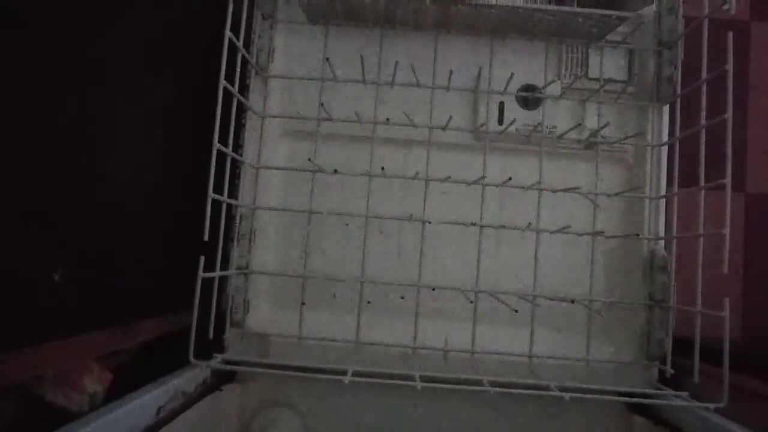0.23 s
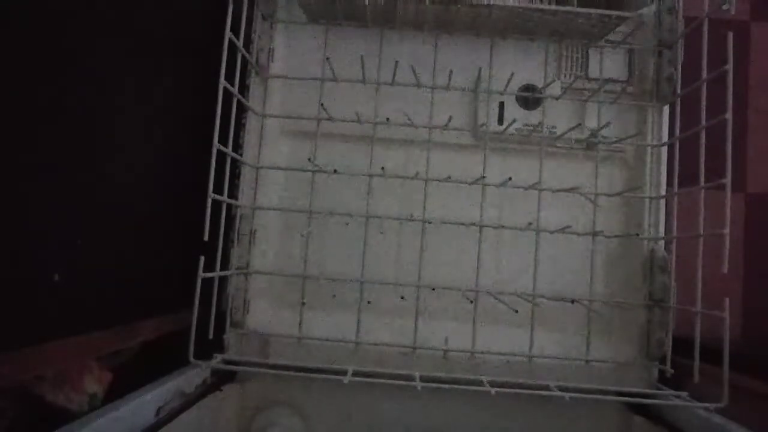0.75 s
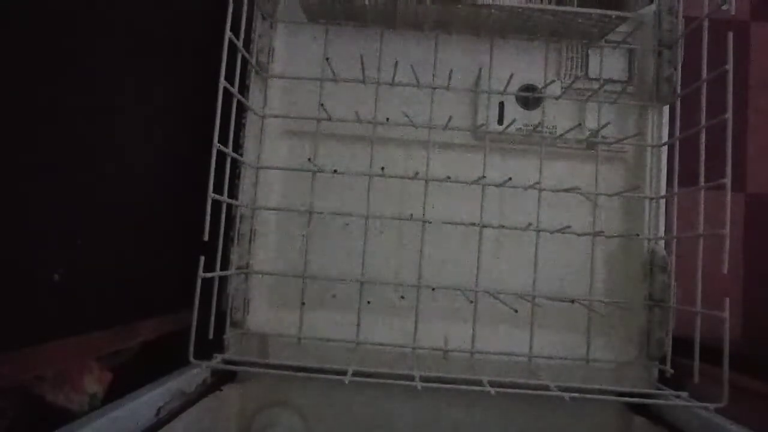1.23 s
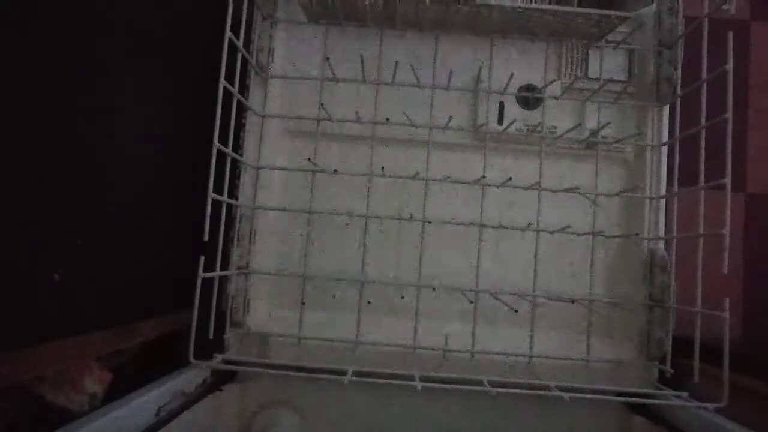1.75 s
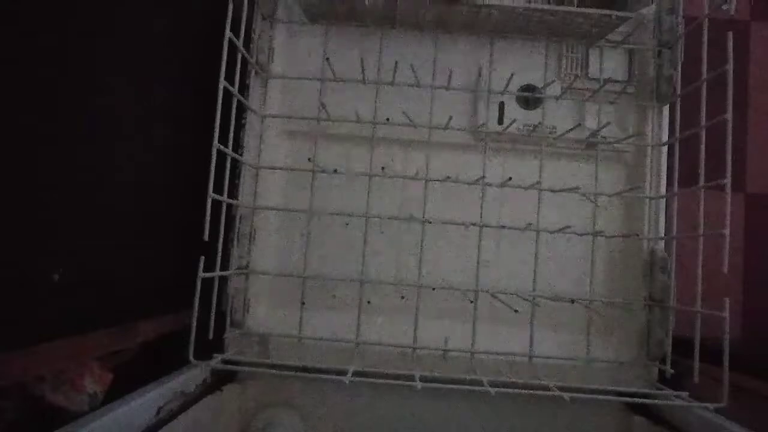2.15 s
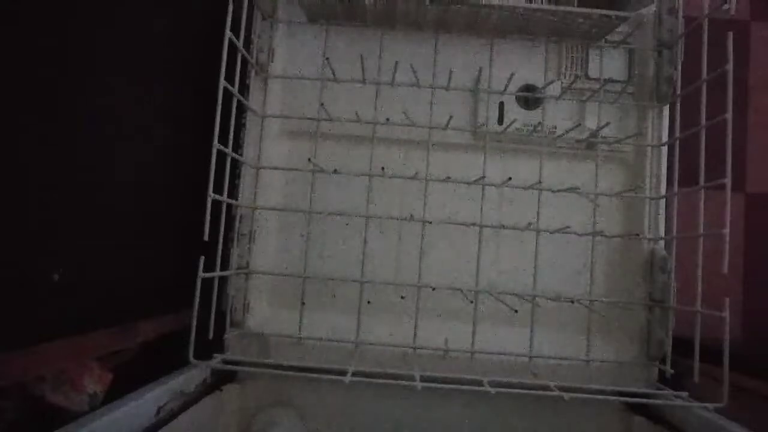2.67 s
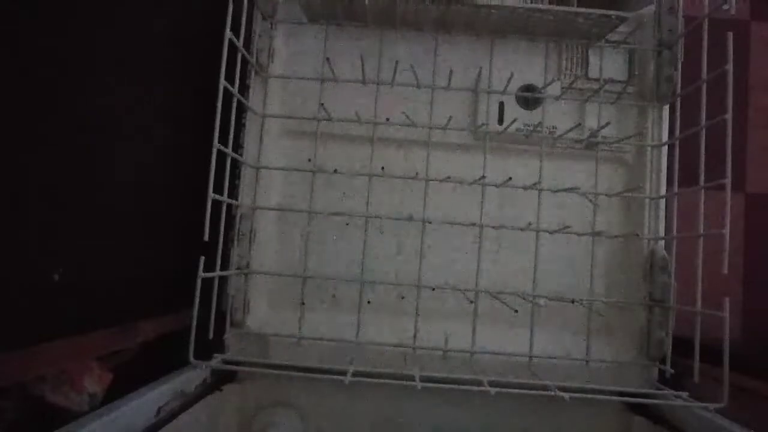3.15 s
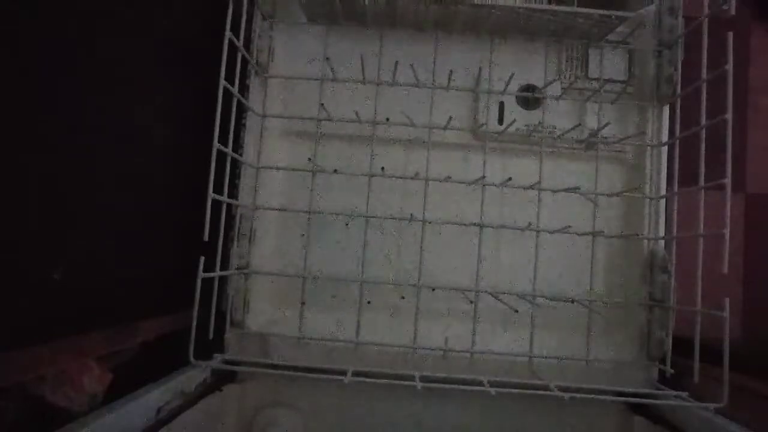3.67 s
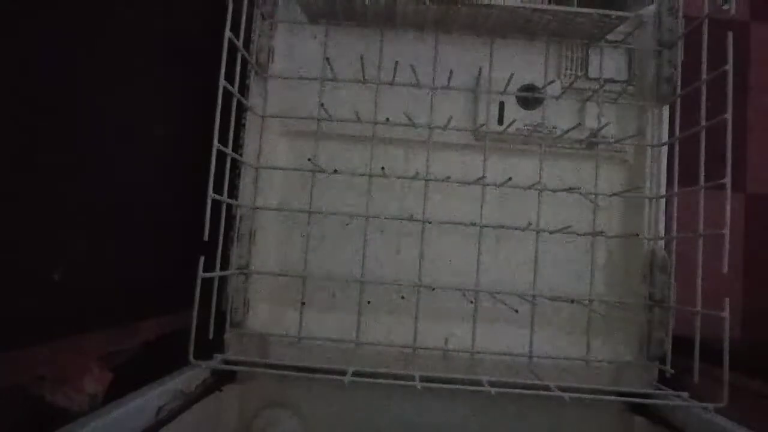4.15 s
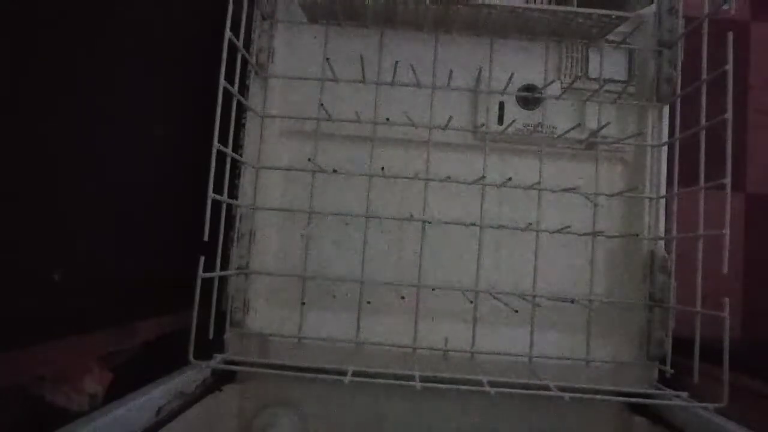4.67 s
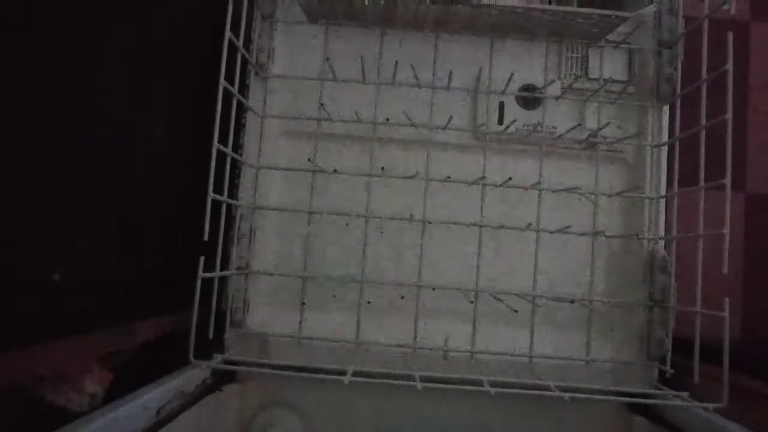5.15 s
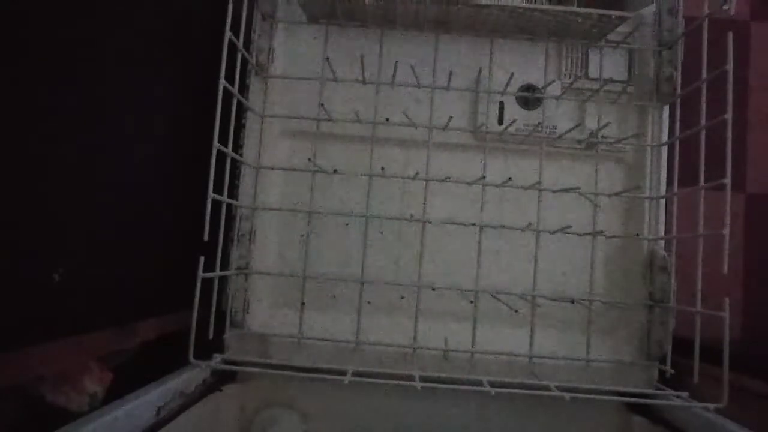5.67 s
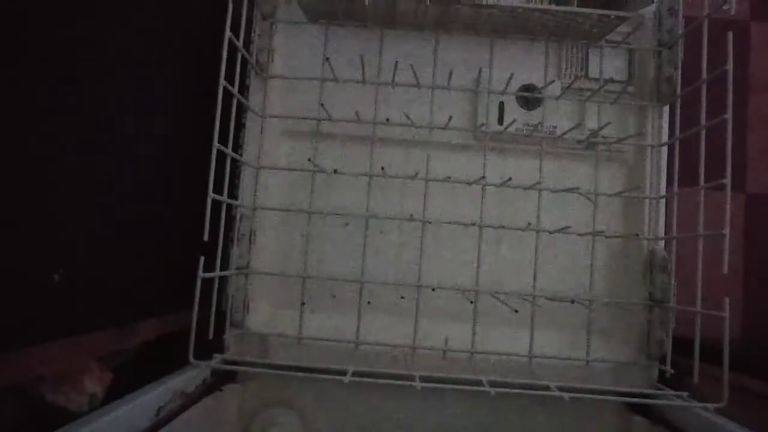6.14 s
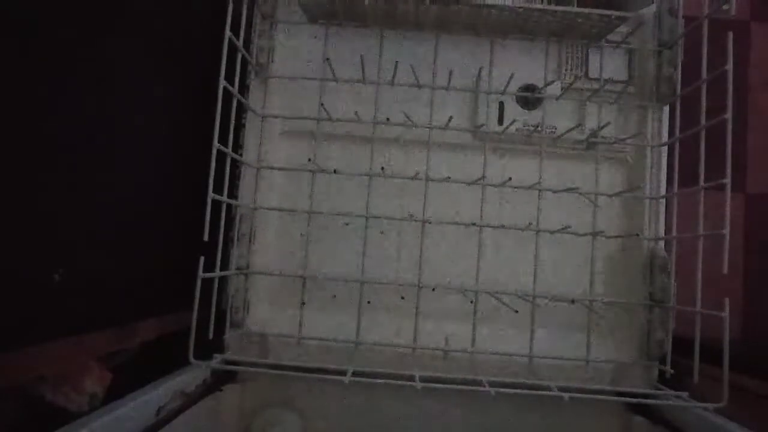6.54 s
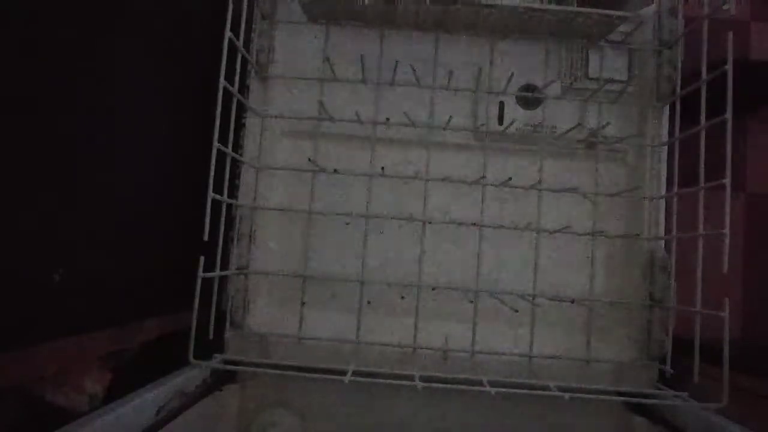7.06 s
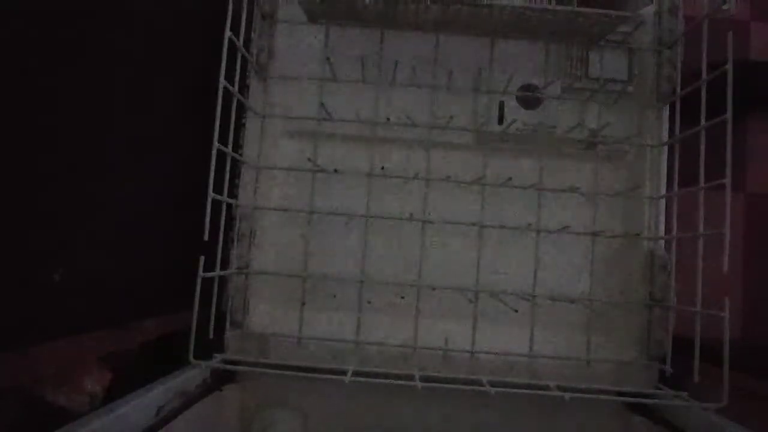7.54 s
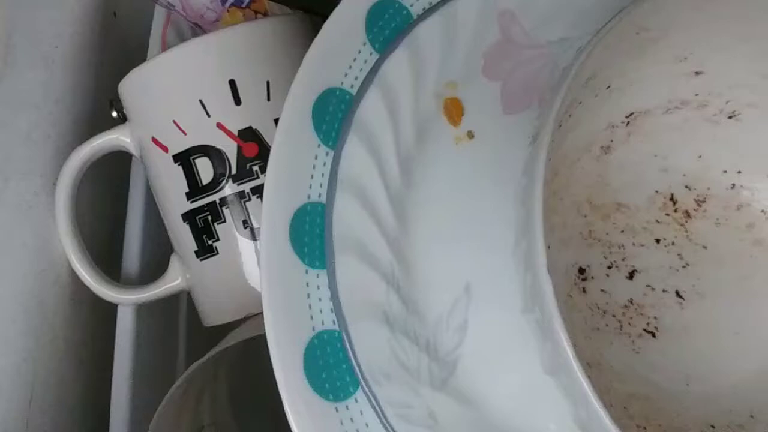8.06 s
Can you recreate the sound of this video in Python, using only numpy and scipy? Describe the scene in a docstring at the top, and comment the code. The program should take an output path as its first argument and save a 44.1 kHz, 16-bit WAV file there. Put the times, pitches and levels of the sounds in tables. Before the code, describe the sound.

Bowls and plates scrape and clink, a wire rack rattles and slams to its stop, then dishes knock and a tub booms before fading.

```python
"""Dishes at an open dishwasher

Bowls and plates scrape, clink and ring, then a wire rack rattles along its rails and hits the stop.
Later dishes clack and knock, and the tub booms, over light taps, brushing fingers and a faint hum.
Blows are noise bursts plus fading sine waves, sliding is rough noise, and the hum is unsteady sines.
At the end all of this fades out and a low rumble of filtered noise fades in."""
import sys
import numpy as np
from scipy import signal
from scipy.fft import rfft, irfft, next_fast_len
from scipy.io import wavfile
from scipy.ndimage import map_coordinates

SR = 44100
rng = np.random.default_rng(int(sys.argv[2]) if len(sys.argv) > 2 else 0)


def generate_wav(signal):
    """Clip the signal to [-1, 1] and save it as 16-bit WAV at the path in sys.argv[1]."""
    frames = np.transpose(np.atleast_2d(signal))
    scaled = np.clip(frames, -1, 1) * 32767
    pcm = np.round(scaled).astype(np.int16)
    wavfile.write(sys.argv[1], SR, pcm)


N = 366462  # length in samples

# Thud, knock, clack, click and sizzle. Each row: lower edge in Hz, upper edge in Hz.
BANDS = [(130, 330), (330, 1000), (1000, 3000), (3000, 6000), (6000, 15500)]
# Height of each band's middle above that of the clack band, in octaves
OCTAVES = np.log2(np.sqrt(np.prod(BANDS, axis=1) / np.prod(BANDS[2])))

# Steady sounds. Room air and rumble, each row: frequency in Hz, relative level in dB per Hz.
AIR_SPECTRUM = [(30, -39), (85, -32), (130, -9), (210, 0), (311, -9.5), (450, -1), (550, -4.5), (700, -4),
                (1280, -11.5), (1860, -12), (3310, -22), (7870, -22), (15500, -32.5)]
RUMBLE_SPECTRUM = [(30, -35), (90, -17), (145, -7), (200, -15.5), (300, -18), (520, -23), (1900, -32),
                   (5000, -27.5), (6200, -42), (12000, -49.5)]
# Motor hum. Each row: frequency in Hz, average level in dB.
HUM_LINES = [(431, -66), (477, -65), (1437, -67), (2003, -69.5), (2385, -75.5)]

# How the room echoes. Each row: frequency in Hz, time to fall by 60 dB in seconds.
ROOM_DECAY = [(200, 0.31), (600, 0.56), (2000, 0.25), (10000, 0.21)]
# How the microphone hears. Each row: frequency in Hz, gain in dB.
MICROPHONE_RESPONSE = [(100, -3.5), (6000, -1.5), (8000, -0.5), (10600, -2.5), (11400, -11.5),
                       (15500, -14.5)]

# Fingers brushing over the dishes. Each row: start in seconds, length in seconds, level in dB.
BRUSHES = [(3.034, .19, -54), (3.315, .2, -56), (3.682, .08, -47), (3.9, .1, -58.5), (4.044, 0.0601, -46.5),
           (4.289, 0.13, -54.5), (4.921, 0.24, -59), (5.903, 0.22, -55.5), (6.806, 0.15, -56),
           (7.119, 0.066, -47.5)]
# Tone of the brushing. Each row: frequency in Hz, relative level in dB per Hz.
BRUSH_SPECTRUM = [(1000, -21), (2500, -5.5), (6500, 0.5), (10400, -6), (15500, -9)]
# Light taps on the wires. Each row: time in seconds, strength in dB, treble hardness in dB per octave.
TAPS = [(3.304, -47.5, .5), (3.597, -57.5, -4), (3.638, -43, -8.5), (3.785, -60, 5), (3.995, -50, -7.5),
        (4.247, -45.5, -5.5), (4.284, -36.5, -4.5), (4.505, -52.5, -1), (4.792, -44, -5),
        (5.92, -50.5, 1.5), (6.054, -52, 1), (6.833, -49, 0), (7.154, -44, -0.3), (7.306, -46, .2)]
# Tone of a tap: thud, knock, clack, click and sizzle in dB.
TAP_COLOUR = (-18.5, -7, -0.5, -2.5, 0)

# Blows on each thing. Each row: time in seconds, strength in dB, hardness in dB per octave,
# ring level in dB (low when the thing is gripped).
RACK_HITS = [(2.391, -12.5, -3.5, -12.5), (2.51, -19.5, -2, -13), (2.647, -7.5, 3, -7),
             (2.666, -14, 4.5, -12), (2.686, -12.5, 4, -11), (2.804, -32.5, -6, -17),
             (2.892, -40.5, -3, -13)]
TUB_HITS = [(6.372, -15, 0.89, 2), (6.467, -28, -0.11, 2.5), (6.628, -21.5, -1.2, -3.5)]
BOWL_HITS = [(0.489, -35.5, -4.5, -18), (0.83, -42.5, 8.5, -10.5), (1.164, -37, -2.5, 1.5),
             (1.221, -38.5, 8.5, -25.5), (1.309, -33, -.5, 2.5), (1.369, -38, 0, -1.5),
             (1.441, -30, -2.44, -3.5), (1.486, -24.5, 5, -4), (1.501, -22.5, 2, -5.5),
             (1.59, -12.5, -0.33, -7), (1.916, -41.5, -2.5, -8), (1.934, -30, 0, -9),
             (2.039, -24, 0.44, -9)]
PLATE_HITS = [(0.756, -16.5, -.2, -1)]
SAUCER_HITS = [(1.011, -31, 0, 1)]
CUP_HITS = [(5.276, -22, .7, -3.5), (5.405, -30.5, -1.1, -8)]
MUG_HITS = [(5.571, -19, 0, -4.5), (5.602, -30, 1, -10.5), (5.636, -12.5, -1, -2.5), (5.681, -32, -1.5, -3),
            (5.737, -13.5, 1, -9.5)]

# The notes each thing rings with, before small random shifts.
# Each row: frequency in Hz, level in dB, time to fall by 60 dB in seconds.
RACK_MODES = [(380, -7.5, 0.59), (620, -6.5, 0.49), (878, -6, 0.53), (1738, -2, .25), (1803, -3, 0.36),
              (1947, -7.5, 0.43), (2410, -10.5, 0.5), (3800, -1, 0.098), (4882, -1, 0.24), (5250, 1, 0.17),
              (6180, -0.5, .22), (6530, 1.5, 0.27)]
TUB_MODES = [(159, -13.5, 0.23), (234, 4.5, 0.27), (275, -8.5, .4), (371, -4.5, 0.34), (648, -11, 0.45),
             (886, -1, 0.13), (1566, -7, 0.19)]
BOWL_MODES = [(431, -14, .7), (567, -4, .28), (700, -2, .2), (1029, -1, .28), (1313, -9, .45),
              (2003, -13, .7), (2028, -3, .2), (2935, -3, .2), (3550, -5, .4), (3915, -4, .38),
              (4400, -5, .3), (5600, -6, .25), (6394, -6, .3), (7225, -4, .35), (7504, -7, .3),
              (8619, -6, .35), (9490, -4, .33), (10110, -5, .3)]
PLATE_MODES = [(466.5, 0, 0.59), (1070, -6, 0.15), (1224, -6, 0.11), (2013, -13.5, .5), (2595, 11, 0.091),
               (2850, -2, 0.2), (4360, 4, 0.2), (4600, -4, 0.18), (5300, 0.5, 0.13), (7100, -7, 0.2),
               (7900, -20, 0.19), (9030, -18, 0.39)]
SAUCER_MODES = [(477, 15.5, 0.053), (723, 2, 0.096), (1527, -1.5, 0.13), (3720, 5, 0.27), (4870, 10, 0.15),
                (6770, 4, 0.23), (7330, -7, 0.33), (7400, -6, 0.39), (8590, -3, 0.43), (10700, -12, 0.49)]
CUP_MODES = [(547, -9, .15), (823, 9.5, 0.078), (1770, -1, 0.22), (4330, 1, 0.13), (5330, -18, .4),
             (7220, -13, 0.49)]
MUG_MODES = [(558, 6.5, 0.084), (1950, 0.5, 0.17), (2170, 1.5, .14), (2300, -3, 0.21), (4050, 2.5, 0.13),
             (4430, 2, 0.17), (8220, -5.5, 0.065), (10660, -4, 0.22)]

# The tone of a blow on each thing: thud, knock, clack, click and sizzle in dB.
RACK_COLOUR = (-24, -3.5, 0, -1, -3)
TUB_COLOUR = (-9.5, -1, -0.5, -8.5, 6.5)
BOWL_COLOUR = (-28.5, -0.5, 0.5, -9.5, -3)
PLATE_COLOUR = (-23, -16, -1.5, -11.5, -2)
SAUCER_COLOUR = (-35, 4, 6.5, -11.5, 8.5)
CUP_COLOUR = (-31, -7.5, 0.5, -8.5, -10.5)
MUG_COLOUR = (-21.5, -10, -1.5, -3.5, 7.5)

# The tone of the rolling rack and of scraping dishes: knock, clack, click and sizzle in dB.
ROLL_COLOUR = (-1, 1.5, -5, -1.5)
SCRAPE_COLOUR = (1.5, -1.5, -10.5, -.5)
# Dish sliding on dish. Each row: start in seconds, length in seconds, strength in dB,
# hardness in dB per octave.
SCRAPES = [(0.057, 0.031, -45, -1.5), (0.136, .19, -54, 2.5), (.39, 0.24, -57, 0.5),
           (0.472, 0.079, -39, -1.5), (0.571, .07, -36.5, -1.6), (.665, 0.08, -54, 4.5),
           (0.705, .03, -37, -2), (0.863, 0.16, -53.5, 2), (1.038, .069, -43, 3), (1.188, 0.027, -41, 4.5),
           (1.322, .057, -37.5, 2.5), (1.451, 0.03, -33, 2), (1.654, .061, -38, 2.65),
           (1.952, .13, -38.5, 0), (2.211, 0.17, -48, 1), (2.283, .033, -43.5, -4.5)]
# Air singing in the changing gap between nested dishes.
# Each row: start in seconds, length in seconds, first pitch in Hz, last pitch in Hz, level in dB.
GAP_TONES = [(0.49, 0.067, 402, 445, -34), (0.585, 0.092, 479, 458, -31.5), (0.788, 0.097, 447, 446, -36.5),
             (1.01, 0.071, 4730, 4630, -41.5), (1.032, 0.045, 3750, 3660, -41),
             (1.077, 0.054, 1820, 1740, -39.5), (1.164, .04, 1930, 1730, -49),
             (1.2, 0.047, 2220, 2500, -39), (1.308, .07, 3950, 3820, -38.5),
             (1.473, 0.064, 1004, 1166, -24), (2.259, 0.048, 423, 343, -41), (3.59, 0.033, 423, 383, -48),
             (3.691, 0.053, 440, 400, -52), (5.63, 0.04, 1950, 2116, -21.5),
             (5.643, 0.093, 2270, 2584, -27.5)]
# A wet finger on glaze. The one row: start in seconds, length in seconds, first pitch in Hz,
# last pitch in Hz, level in dB.
SQUEAK = (4.965, .085, 2210, 2090, -56)
# Levels in dB of the squeak's first to fifth partial.
SQUEAK_PARTIALS = (-2, -4, -3, 2, -5)

TAP_T60_S = .135  # time for a tap to fall by 60 dB
# The rack's rattle grows until it runs at full speed
ROLL_START_S, ROLL_END_S = 2.42, 2.66
ROLL_START_DB, ROLL_RISE_DB_PER_S, ROLL_FULL_DB = -26, 64, -17
# The kitchen fades out along a power curve; the rumble fades in along a straight line
FADE_START_S, FADE_END_S, FADE_POWER = 6.49, 8.09, 1.21
RUMBLE_START_S, RUMBLE_DB = 8.08, -57
TOP_HZ = 15900  # nothing is kept from here up


def amp(db):
    """Turn decibels into a gain."""
    return 10 ** (np.asarray(db) / 20)


def unit(x):
    """Scale to an average (rms) level of 1."""
    return x / np.sqrt(np.mean(x ** 2, axis=-1, keepdims=True) + 1e-20)


def along(points, hz):
    """Read between (Hz, value) points on a logarithmic frequency axis."""
    f, v = np.transpose(points)
    return np.interp(np.log(hz + 1), np.log(f + 1), v)


def wobble(rate, size):
    """Draw a smooth random curve through a given number of random points per second."""
    knots = rng.standard_normal(4096)
    return map_coordinates(knots, [np.arange(size) * rate / SR], mode="wrap")


def ramp(start_s, end_s):
    """Draw a straight line from 0 at one time to 1 at the other, level beyond them."""
    return np.clip((np.arange(N) / SR - start_s) / (end_s - start_s), 0, 1)


def add(track, s, x):
    """Mix x into the track from time s in seconds."""
    start = max(round(s * SR), 0)
    track[start:start + len(x)] += x[:N - start]


def filtered(x, response):
    """Multiply the spectrum of x by a response that depends on frequency."""
    size = x.shape[-1]
    m = next_fast_len(size + 4096)
    spectrum = rfft(x, m) * response(np.fft.rfftfreq(m, 1 / SR))
    return irfft(spectrum, m)[..., :size]


def noise(spectrum):
    """Make noise at rms 1 with a given spectrum."""
    return unit(filtered(rng.standard_normal(N), lambda hz: amp(along(spectrum, hz))))


def split(x, uneven_db=2, width_hz=110):
    """Split x into five bands at rms 1 each; every spot in the tub has its own peaks and notches."""
    def response(hz):
        knots = rng.standard_normal(1024)
        peaks = amp(uneven_db * map_coordinates(knots, [hz / width_hz], mode="wrap"))
        bands = [((1 + (low / (hz + 1)) ** 10) * (1 + (hz / high) ** 10)) ** -.5 for low, high in BANDS]
        return peaks * np.array(bands)
    return unit(filtered(x, response))


def ring(modes, colour, scatter_db=2, chatter_s=.00003):
    """Ring a struck body: the hardness and place of the contact share the energy among its notes."""
    t = np.arange(SR * 3 // 4) / SR
    hz, db, t60 = np.transpose(modes)[:, :, None]
    tilt = np.interp(np.log(hz), np.log(BANDS).mean(1), colour)
    level = db + tilt + scatter_db * rng.standard_normal(hz.shape)
    # grip and load shift the notes from one contact to the next, the high ones most
    hz = hz * (1 + .016 * np.minimum(hz / 8000, 1) * rng.standard_normal(hz.shape))
    # the thing chatters on its support, which blurs the high notes
    clock = t + chatter_s * wobble(70, len(t))
    waves = np.sin(2 * np.pi * (hz * clock + rng.random(hz.shape)))
    return np.sum(amp(level - 60 * t / t60) * waves, 0)


def strikes(hits, modes, colour_db, t60, clatter_db, crack_db, attack, dwell, uneven_db):
    """Make each blow: a crack, a dense clatter thrown about the tub, and a ring; harder is brighter."""
    out = np.zeros(N)
    for s, db, hardness, ring_db in hits:
        colour = np.array(colour_db) + hardness * OCTAVES
        tone = amp(ring_db) * ring(modes, colour)
        t = np.arange(len(tone)) / SR
        # reflections keep the level up for a moment (dwell, in seconds) before it drains away
        drain = amp(clatter_db - 60 * np.maximum(t - dwell, 0) / t60)
        crack = amp(crack_db - 60 * t / 0.0054)
        bands = split(rng.standard_normal(len(t)), uneven_db)
        clatter = (drain + crack) * (amp(colour) @ bands)
        onset = 1 - np.exp(-t / attack)
        add(out, s - .001, amp(db) * (clatter + tone) * onset)
    return out


def rub(t, modes, ring_db, rough_db, uneven_db):
    """Slide in the four upper bands: uneven slips drive a rasp and the body's ringing."""
    slips = rng.standard_normal(len(t)) * amp(rough_db * wobble(170, len(t)))
    body = signal.fftconvolve(slips, ring(modes, np.zeros(len(BANDS))))[:len(t)]
    return split(unit(slips) + amp(ring_db) * unit(body), uneven_db)[1:]


def background():
    """Mix room air, as filtered noise, with the slightly unsteady sine waves of a motor."""
    t = np.arange(N) / SR
    hum = np.zeros(N)
    for hz, db in HUM_LINES:
        level = amp(db + 2.6 * wobble(4, N)) * np.sqrt(2)
        hum += level * np.sin(2 * np.pi * hz * t + .7 * wobble(2.6, N))
    air = amp(-53 + 0.68 * wobble(4.3, N)) * noise(AIR_SPECTRUM)
    return hum + air


def rumble():
    """Fade in a low rumble of filtered noise at the end."""
    return amp(RUMBLE_DB) * ramp(RUMBLE_START_S, N / SR) * noise(RUMBLE_SPECTRUM)


def kitchen_echo(x):
    """Answer x with fading noise: the room's echo, which dies away fastest in the treble."""
    hz, t, z = signal.stft(rng.standard_normal(SR), SR, nperseg=256)
    fall = amp(-60 * t / along(ROOM_DECAY, hz)[:, None])
    tail = signal.istft(z * fall, SR, nperseg=256)[1]
    delayed = np.pad(tail, (400, 0))  # in samples, about 9 ms
    return signal.fftconvolve(x, delayed / np.linalg.norm(tail))[:N]


def brushes():
    """Brush fingers over the dishes: soft strokes of hiss with an unsteady level."""
    out, hiss = np.zeros(N), noise(BRUSH_SPECTRUM)
    for s, length, db in BRUSHES:
        size = int(length * SR)
        level = amp(db + 3.9 * wobble(29, size)) * signal.windows.tukey(size, .8)
        add(out, s, level * hiss[int(s * SR):][:size])
    return out


def taps():
    """Tap the wires lightly: short noise bursts with a fast and a slow fall; harder is brighter."""
    out, t = np.zeros(N), np.arange(SR // 4) / SR
    fall = amp(-1.5 - 60 * t / TAP_T60_S) + amp(-6 - 60 * t / 0.0136)
    fall = fall * (1 - np.exp(-t / .0005))
    for s, db, hardness in TAPS:
        colour = np.array(TAP_COLOUR) + hardness * np.maximum(OCTAVES, 0)
        add(out, s, amp(db) * fall * (amp(colour) @ split(rng.standard_normal(len(t)))))
    return out


def rack_roll():
    """Rattle the rack along its rails: a growing rub that makes the wires ring."""
    out, t = np.zeros(N), np.arange(0, ROLL_END_S - ROLL_START_S, 1 / SR)
    level_db = np.minimum(ROLL_START_DB + ROLL_RISE_DB_PER_S * t, ROLL_FULL_DB)
    bands = rub(t, RACK_MODES, ring_db=-15.5, rough_db=2, uneven_db=2.5)
    rattle = amp(level_db) * (amp(ROLL_COLOUR) @ bands)
    add(out, ROLL_START_S, rattle * signal.windows.tukey(len(t), .1))
    return out


def rack():
    """Roll the wire rack, slam it into its stop, and later knock it against the booming tub."""
    jolts = strikes(RACK_HITS, RACK_MODES, RACK_COLOUR, t60=0.22, clatter_db=-5.5, crack_db=-11,
                    attack=.0015, dwell=.012, uneven_db=3)
    knocks = strikes(TUB_HITS, TUB_MODES, TUB_COLOUR, t60=.15, clatter_db=-1.5, crack_db=-5.0,
                     attack=0.0019, dwell=0.017, uneven_db=2.0)
    return rack_roll() + jolts + knocks


def squeak():
    """Stick and slip a finger on clean glaze: a faint falling stack of partials."""
    s, length, start_hz, end_hz, db = SQUEAK
    out, size = np.zeros(N), int(length * SR)
    pitch = np.linspace(start_hz, end_hz, size) * (1 + .009 * wobble(260, size))
    phase = 2 * np.pi * np.cumsum(pitch) / SR
    stack = sum(amp(level) * np.sin(k * phase) for k, level in enumerate(SQUEAK_PARTIALS, 1))
    add(out, s, amp(db) * signal.windows.tukey(size, .5) * stack)
    return out


def gap_tones(base_width_hz=55, width_share=0.039):
    """Sing narrow air resonances that glide as one dish moves inside another."""
    out = np.zeros(N)
    for s, length, start_hz, end_hz, db in GAP_TONES:
        size = int(length * SR)
        phase = 2 * np.pi * np.cumsum(np.linspace(start_hz, end_hz, size)) / SR
        # two random curves turn a plain tone into a narrow band of noise
        width = base_width_hz + width_share * start_hz
        tone = wobble(width, size) * np.sin(phase) + wobble(width, size) * np.cos(phase)
        add(out, s, amp(db) * unit(tone) * signal.windows.tukey(size, .5))
    return out


def scrapes(rise=0.03, t60=0.24):
    """Scrape dish on dish in short strokes that die away in the tub; rims hiss, broad faces grind."""
    out = np.zeros(N)
    for s, length, db, hardness in SCRAPES:
        t = np.arange(int((length + t60) * SR)) / SR
        stroke = np.minimum(t / rise, 1) * amp(db - 60 * np.maximum(t - length, 0) / t60)
        colour = np.array(SCRAPE_COLOUR) + hardness * OCTAVES[1:]
        bands = rub(t, BOWL_MODES, ring_db=-11.5, rough_db=1.5, uneven_db=4.5)
        add(out, s, stroke * (amp(colour) @ bands))
    return out


def crockery():
    """Slide dishes over each other and knock them together, each ringing with its own notes."""
    bowl = strikes(BOWL_HITS, BOWL_MODES, BOWL_COLOUR, t60=.19, clatter_db=-4.0, crack_db=-5,
                   attack=0.0014, dwell=0.0049, uneven_db=5.0)
    plate = strikes(PLATE_HITS, PLATE_MODES, PLATE_COLOUR, t60=0.18, clatter_db=-6.0, crack_db=-10.5,
                    attack=.0007, dwell=0.0074, uneven_db=1.5)
    saucer = strikes(SAUCER_HITS, SAUCER_MODES, SAUCER_COLOUR, t60=0.064, clatter_db=-6.0, crack_db=-14,
                     attack=0.0049, dwell=.008, uneven_db=4.0)
    cup = strikes(CUP_HITS, CUP_MODES, CUP_COLOUR, t60=0.15, clatter_db=-3.0, crack_db=-5,
                  attack=0.0024, dwell=0.0054, uneven_db=2)
    mug = strikes(MUG_HITS, MUG_MODES, MUG_COLOUR, t60=0.15, clatter_db=-5.5, crack_db=-5,
                  attack=0.00026, dwell=0.0069, uneven_db=2.5)
    return squeak() + gap_tones() + scrapes() + bowl + plate + saucer + cup + mug


def scene():
    """Mix the kitchen and its echo, fade them out, and bring in the rumble."""
    near = brushes() + taps() + rack() + crockery()
    room = background() + near + amp(-22.5) * kitchen_echo(near)
    # with its two times swapped, the ramp falls from 1 to 0
    fade_out = ramp(FADE_END_S, FADE_START_S) ** FADE_POWER
    return (room * fade_out + rumble())[None]


def record(dry, hardness=5):
    """Pass the sound through a small microphone with a dull top; the loudest blows saturate it."""
    ceiling = .8
    x = filtered(dry, lambda hz: amp(along(MICROPHONE_RESPONSE, hz)))
    x = x / (1 + np.abs(x / ceiling) ** hardness) ** (1 / hardness)
    return filtered(x, lambda hz: hz < TOP_HZ)


dry = scene()
out = record(dry)
generate_wav(out)
```